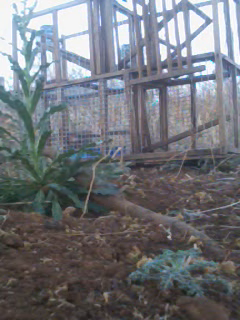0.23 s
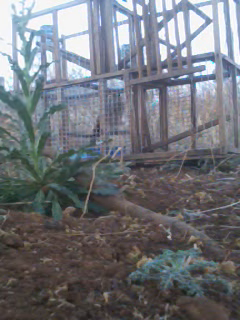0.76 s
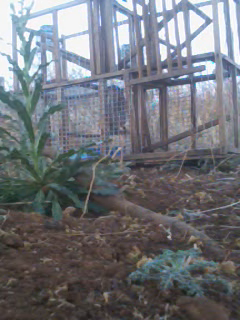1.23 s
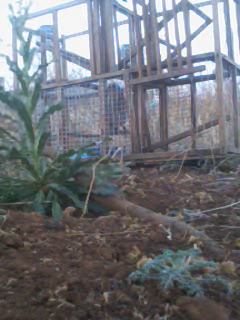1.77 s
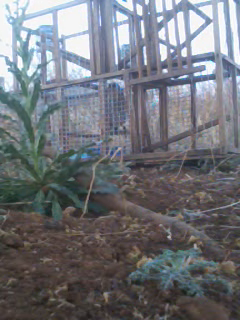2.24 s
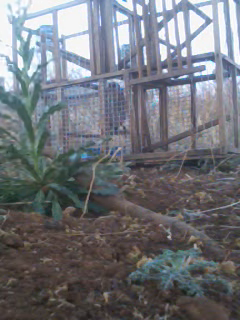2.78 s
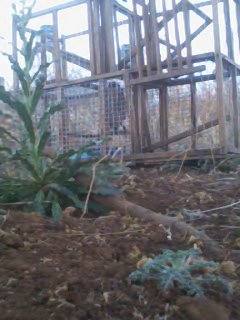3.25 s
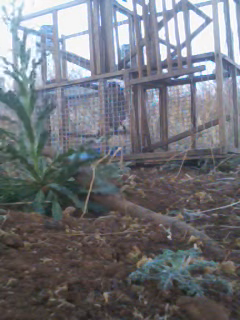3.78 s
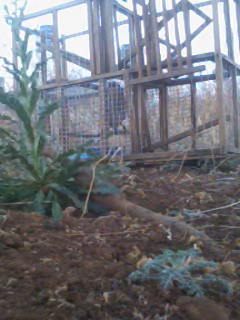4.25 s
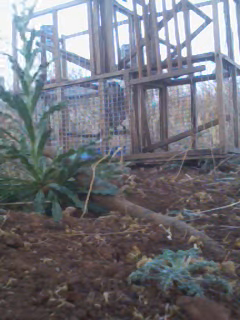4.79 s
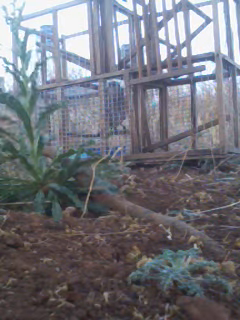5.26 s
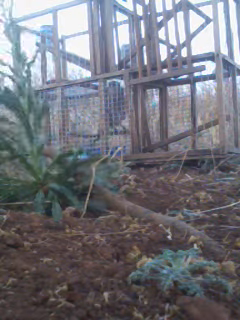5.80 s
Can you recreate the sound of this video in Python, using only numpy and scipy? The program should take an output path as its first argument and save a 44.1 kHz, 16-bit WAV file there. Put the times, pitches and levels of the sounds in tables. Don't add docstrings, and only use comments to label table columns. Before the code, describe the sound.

A songbird a few metres away in an open yard makes two short, rapidly throbbing buzzes, then three shrill, rough two-voiced squeals that shake at the start, then a long low falling whistle and a shorter dipping one. Faint wing flutters, small knocks on wire and wood, and a distant bird's tiny chirps surround it. Wind gusts thump softly on a small, dull-topped microphone over light hiss.

```python
import sys
import numpy as np
from scipy import signal
from scipy.fft import rfft, irfft, next_fast_len
from scipy.io import wavfile
from scipy.ndimage import uniform_filter1d

SR = 44100
rng = np.random.default_rng(int(sys.argv[2]) if len(sys.argv) > 2 else 0)


def unload_wav(signal):
    wavfile.write(
        sys.argv[1],
        SR,
        np.round(np.clip(np.atleast_2d(signal).T, -1, 1) * 32767).astype(np.int16),
    )


def undo_db(level):
    steps = np.asarray(level, float) / 20
    return 10 ** steps


N = 266364


def evened(x):
    return x / np.sqrt(np.mean(x ** 2) + 1e-20)


def white(count):
    return rng.standard_normal(size=N if count > SR else SR + 1)[:count]


def drift(count, hz):
    low_pass = signal.butter(2, min(hz, 9000), fs=SR)
    return evened(signal.lfilter(*low_pass, white(count)))


def shape(x, points):
    f, db = np.transpose(points)
    size = next_fast_len(len(x))
    hz = np.fft.rfftfreq(size, 1 / SR)
    gain = undo_db(np.interp(np.log(hz + 1), np.log(f + 1), db))
    return irfft(rfft(x, size) * gain, size)[:len(x)]


def curves(rows, t=None):
    s, *columns = np.transpose(rows)
    t = np.arange(s[0], s[-1], 1 / SR) if t is None else t
    return t, [np.interp(t, s, c) for c in columns]


def add(mix, s, sound):
    part = mix[round(s * SR):][:len(sound)]
    part += sound[:len(part)]


# (time [s], effort [dB])
BUZZ_EFFORTS = [
    [(0.895, -89), (0.913, -63), (0.955, -61.5), (0.987, -53), (1.195, -47), (1.232, -52.5), (1.262, -109)],
    [(1.67, -79), (1.688, -59), (1.716, -49.5), (1.774, -46.5), (2.008, -47), (2.028, -51.5), (2.047, -100)],
]
# (early pitch [Hz], late pitch [Hz], early level [dB], late level [dB])
THROAT_BANDS = [
    [(2104, 2040, -5.5, -7.5), (2843, 2710, 0, -3), (3500, 3370, -15.5, -13), (4200, 3960, -8, -9),
     (4780, 4630, -21, -6), (5410, 5550, -12.5, -14), (6260, 6450, -9, -26), (7000, 7000, -14.5, -21)],
    [(2140, 2110, -2, -9.5), (2894, 2890, 1.5, -2), (3670, 3640, -9.5, -12.5), (4215, 4260, -5.5, -8),
     (5140, 4900, -7, -21), (5800, 5630, -16.5, -3), (6430, 6420, -9, -15.5), (7160, 7040, -14, -16.5)],
]
# (time [s], throbs so far [count])
THROB_COUNTS = [
    [(.888, -1.5), (.9019, .47), (.9582, 8.47), (1.0019, 14.47), (1.0481, 20.47), (1.1284, 30.47),
     (1.187, 37.47), (1.268, 46.47)],
    [(1.668, -1.5), (1.6819, .47), (1.7455, 9.47), (1.7906, 15.47), (1.871, 25.47), (1.9547, 35.47),
     (2.0095, 41.47), (2.058, 46.47)],
]
# (loss [dB], over [s])
BAND_ENTRIES = [(19.5, 0.067), (6, 0.07)]
ENTRY_SHARES = [0, 1.4, 1.2, 0.43, 0.93, 1.5, 1.5, 1.1]
SHORTER_PER_DB = 0.5


def buzz(efforts, throat, throbs, entry):
    t, (effort_db,) = curves(efforts)
    weak_db = effort_db - effort_db.max()
    turns = 2 + curves(throbs, t)[1][0] + .03 * drift(len(t), 40)
    turns = np.maximum.accumulate(turns)
    throb, phase = turns.astype(int), turns % 1
    sharpness = 1.5 + SHORTER_PER_DB * np.minimum(-weak_db, 20)
    opening = 0.33 * np.sin(np.pi * phase) ** 1.1 + np.sin(np.pi * phase ** 0.86) ** sharpness
    late = np.clip((t - t[0] - .12) / 0.36, 0, 1)
    slide = 0.47 * np.exp((t[0] - t) / 0.014) + 0.25 * np.exp((t - t[-1]) / 0.018)
    chirp_hz = 80 * np.cos(np.pi * phase)
    entry_db = entry[0] * np.exp(-((t - t[0]) / entry[1]) ** 3.0)
    tone = 0
    for k, (early_hz, late_hz, early_db, late_db) in enumerate(throat):
        chance = rng.standard_normal(size=(80, 3))[throb].T
        detune = 1 - slide / (1 + 0.24 * k) + 0.0025 * np.sqrt(k) * chance[2]
        hz = (early_hz + late * (late_hz - early_hz)) * detune + chirp_hz
        steps = np.cumsum(hz) / SR
        since = steps - steps[np.searchsorted(throb, throb)]
        db = early_db + late * (late_db - early_db) + 0.38 * np.sqrt(k) * weak_db
        db = db + 0.33 * (1 + np.sqrt(k)) * chance[1] - ENTRY_SHARES[k] * entry_db
        start = .8 * k ** 2 + 0.22 * (1 + k) * chance[0]
        tone = tone + undo_db(db) * np.sin(2 * np.pi * since + start)
    air_band = [(700, -1.5), (1700, -13.5), (2500, 4.0), (3500, 2.5),
                (5000, -1.5), (7000, -8.5), (8000, -5.5), (8100, -68)]
    air = undo_db(-7 + 0.61 * weak_db) * evened(shape(white(len(t)), air_band))
    sound = shape(opening * (tone + air), [(600, -17.5), (1500, -6.0), (8000, 1.0)])
    treble = shape(sound, [(4600, -36), (5200, -8)])
    sound = sound - (1 - undo_db(-1.5 * entry_db)) * treble
    return t[0], undo_db(effort_db) * sound / np.sqrt(uniform_filter1d(sound ** 2, size=1500))


# (time [s], pitch [Hz], level [dB])
LOWER_VOICES = [
    [(2.276, 2494, -65.5), (2.3, 4120, -55), (2.34, 4410, -60.5), (2.39, 4410, -55.5), (2.49, 4135, -52.5),
     (2.63, 4033, -50.5), (2.85, 3808, -48.5), (2.864, 4290, -62), (2.878, 5130, -86)],
    [(3.037, 2903, -64), (3.05, 3714, -48.5), (3.07, 4150, -52.5), (3.11, 4200, -53), (3.22, 4035, -47),
     (3.27, 3880, -49.5), (3.4, 3815, -49), (3.512, 3788, -52), (3.542, 4840, -73)],
    [(3.76, 2310, -53.5), (3.775, 3457, -50), (3.792, 4000, -49.5), (3.87, 4070, -50.5), (3.95, 4000, -47),
     (4.01, 3788, -48.5), (4.11, 3685, -46), (4.238, 3680, -58.5), (4.254, 4070, -70)],
]
# (time [s], pitch [Hz])
UPPER_VOICES = [
    [(2.278, 3214), (2.294, 5263), (2.312, 6160), (2.37, 6136), (2.44, 5592), (2.53, 5294), (2.66, 5212),
     (2.785, 5127), (2.83, 5005)],
    [(3.04, 4600), (3.062, 5470), (3.09, 6220), (3.16, 5735), (3.22, 5464), (3.285, 5268), (3.41, 5140),
     (3.485, 5054), (3.54, 4970)],
    [(3.757, 3050), (3.775, 4500), (3.79, 5530), (3.815, 6080), (3.878, 5793), (3.92, 5560), (3.985, 5265),
     (4.105, 5130), (4.26, 4730)],
]
# (level [dB], tires from [s], loss [dB], over [s])
UPPER_SWELLS = [(-49, 2.802, 18.5, 0.054), (-44, 3.394, 18, 0.14), (-45, 4.115, 10, .01)]
# (one trough at [s], settles after [s], depth share [1])
OPENING_SHAKES = [(2.353, 0.09, 1.7), (3.092, 0.078, 0.99), (3.8396, .108, 1.2)]
# (rate [1/s], slowing [1/s per s], share felt by the lower voice [1])
PACES = [(86.8, 18, .7), (86, 24, .15), (91.4, 230, 0.059)]
BEAK_HZ, BEAK_WIDTH_HZ, OCTAVE_DB, OCTAVE_EFFORT = 7700, 150, -10, 2.65
UNDER = .505


def squeal(lower, upper, swell, shaking, pace):
    t, (low_hz, low_db) = curves(lower)
    count = len(t)
    low_hz = low_hz + stepped(t)
    up_hz = curves(upper, t)[1][0]
    up_db = upper_level(t, upper[0][0], swell)
    beak_loss_db = 10 * np.log10(1 + ((2 * low_hz - BEAK_HZ) / BEAK_WIDTH_HZ) ** 2)
    octave_db = OCTAVE_DB - 49.5 + OCTAVE_EFFORT * (low_db + 51.0) - beak_loss_db
    depth_hz, under_db, rough = unrest(t, *shaking[1:])

    rate_hz = np.maximum(pace[0] - pace[1] * (t - shaking[0]), 60)
    turns = np.cumsum(rate_hz + 2.1 * drift(count, 30)) / SR
    turns = turns - np.interp(shaking[0], t, turns)
    dips_hz = depth_hz * (.27 - np.cos(np.pi * turns) ** 8)
    saw = signal.sawtooth(2 * np.pi * turns, .8)
    shake_hz = depth_hz * (.67 - (1 - saw) ** 2 / 2)

    low_hz_shaken = low_hz + pace[2] * shake_hz + 1.06 * dips_hz
    low = 2 * np.pi * np.cumsum(low_hz_shaken + (5 + 170 * rough ** 2) * drift(count, 150)) / SR
    up = 2 * np.pi * np.cumsum(up_hz + shake_hz + (8 + 50 * rough ** 2) * drift(count, 130)) / SR
    under_hz = UNDER * (low_hz + .8 * shake_hz) + 180 * rough ** 2 * drift(count, 110)
    under = 2 * np.pi * np.cumsum(under_hz) / SR

    low_wobble_db = (0.5 + 2.3 * rough) * drift(count, 100)
    sound = undo_db(low_db + 0.0031 * shake_hz + low_wobble_db) * np.sin(low)
    sound += undo_db(up_db + 0.98 * drift(count, 80)) * np.sin(up)
    sound += undo_db(octave_db + 6.5 - 0.049 * dips_hz) * np.sin(2 * low + rough * drift(count, 300))
    drive_db = 0.73 * low_db + 0.31 * np.maximum(up_db, low_db - 2.5)
    drive_db = uniform_filter1d(drive_db, size=600)
    sound += mixed_tones(t, (low, up, under), drive_db, under_db, rough, shake_hz)
    sound += torn_air(drive_db, rough)
    return t[0], np.sqrt(2) * sound * signal.windows.tukey(count, .012)


# (time [s], half width [s], depth [dB])
UPPER_BREAKS = [(2.36, 0.26, 0.5), (2.505, 0.017, 9), (2.615, 0.013, 12.5), (2.655, 0.029, 5),
                (2.68, 0.0028, 14), (2.724, 0.0085, 18), (2.801, 0.0049, 16), (2.82, 0.0039, 4),
                (3.208, 0.0032, 19), (3.249, 0.0055, 29), (3.29, 0.049, 1.5), (3.354, 0.033, 7.5),
                (3.442, 0.0097, 8), (3.944, 0.0028, 5), (3.97, 0.0038, 8), (4.045, 0.024, 14),
                (4.068, 0.0054, 0.5)]
ATTACK_S, ATTACK_DB, RELEASE_S, RELEASE_DB = 0.028, 22.5, 0.016, 28


def upper_level(t, start_s, swell):
    hold_db, tires_s, loss_db, over_s = swell
    db = hold_db - loss_db * np.clip((t - tires_s) / over_s, 0, 1)
    db = db - RELEASE_DB * np.maximum(1 - (t[-1] - t) / RELEASE_S, 0)
    db = db - ATTACK_DB * np.clip(1 - (t - start_s) / ATTACK_S, 0, 1)
    return db - sum(depth * np.exp(-((t - s) / width) ** 2) for s, width, depth in UPPER_BREAKS)


MIXED_TONES = [(2, -1, 0), (-2, 2, 0), (3, -1, 0), (-1, 2, 0), (0, 0, 1), (1, 0, 1), (0, 1, -1), (0, 1, 1),
               (2, -1, 1), (-1, 1, 0)]
MIXED_LEVELS_DB = [-20, -20, -19.5, -20, -3, 3.5, 0, 0.5, -12, -34.5]
# (from [s], to [s], gain led by the lower [dB], gain led by the upper [dB])
COUPLINGS = [(2.287, 2.395, 7, -2), (2.395, 2.44, 9, 1), (2.77, 2.85, 0, -3), (3.13, 3.287, 2.5, -3.5),
             (3.33, 3.55, -5.5, 1.5), (3.79, 3.88, 0.5, 2), (3.878, 4.05, 2, 1), (4.07, 4.124, -10, -2),
             (4.125, 4.182, -8, 8.5), (4.18, 4.302, -11, 5)]
STEAL = 0.37


def mixed_tones(t, voices, drive_db, under_db, rough, shake_hz):
    low, up, under = voices
    grips_db = sum(np.outer(db, (t >= on) * (t < off)) * 1. for on, off, *db in COUPLINGS)
    low_grip_db, up_grip_db = uniform_filter1d(grips_db, size=900, axis=1)
    sound = 0
    for (m, n, u), db in zip(MIXED_TONES, MIXED_LEVELS_DB):
        level_db = drive_db + db + 0.01 * shake_hz + 1.8 * drift(len(t), 44)
        if u:
            level_db = level_db + under_db
        elif m + n == 0:
            level_db = level_db + STEAL * (CALM_UNDER_DB - under_db)
        if m > 1 > u or m == n:
            level_db = level_db + low_grip_db
        if m + u < 0:
            level_db = level_db + up_grip_db
        jitter = 2.4 * rough ** 1.5 * drift(len(t), 330)
        sound = sound + undo_db(level_db) * np.sin(m * low + n * up + u * under + jitter)
    return sound


def torn_air(drive_db, rough):
    count = len(rough)
    air = shape(white(count), [(1700, -25.0), (2500, 3.5), (3300, 15.5), (4300, 4.5),
                               (4750, -5), (5300, 4.5), (5900, 10), (8000, -11.5)])
    flicker = undo_db(3 * drift(count, 250))
    return undo_db(drive_db - 1.5) * rough ** 1.07 * evened(air) * flicker


# (from [s], to [s], roughness [0-1], undertone [dB])
UNREST_SPELLS = [(2.26, 2.395, 0.47, -17), (2.395, 2.438, 0.22, -28), (2.439, 2.5, 0.4, -12.5),
                 (2.494, 2.668, 0.2, -12), (2.673, 2.768, 0.26, -17), (2.844, 2.858, 0.3, -12.5),
                 (3.02, 3.133, 0.28, -20), (3.305, 3.325, 0.48, -16.5), (3.318, 3.362, 0.26, -22),
                 (3.362, 3.386, 0.4, -22.5), (3.393, 3.42, .2, -19.5), (3.42, 3.528, 0.52, -15),
                 (3.74, 3.89, 0.23, -25.5), (4.088, 4.124, .17, -24), (4.123, 4.179, 0.48, -15),
                 (4.179, 4.24, 0.38, -22)]
CALM_ROUGH, CALM_UNDER_DB, BLEND_S = 0.11, -38.5, 0.014
SHAKE_HZ, SHAKE_GAIN_HZ, CALM_HZ, SETTLE_S = 168, 176, 24.32, 0.016
SHAKE_ONSET_S = .035
CRACK_S, CRACK_ROUGH, CRACK_UNDER_DB = 0.021, 0.75, -28


def unrest(t, shake_s, share):
    since, cracked = t - t[0], t > t[-1] - CRACK_S
    onset = np.minimum(since / SHAKE_ONSET_S, 1) ** 2
    deepening_hz = SHAKE_HZ + SHAKE_GAIN_HZ * np.minimum(since / shake_s, 1)
    settling = np.exp(np.minimum(shake_s - since, 0) / SETTLE_S)
    depth_hz = CALM_HZ + share * onset * deepening_hz * settling
    rough = np.full(len(t), CALM_ROUGH)
    under_db = np.full(len(t), float(CALM_UNDER_DB))
    for from_s, to_s, spell_rough, db in UNREST_SPELLS:
        inside = (t >= from_s) & (t < to_s)
        rough[inside], under_db[inside] = spell_rough, db
    rough[cracked], under_db[cracked] = CRACK_ROUGH, CRACK_UNDER_DB
    state = [depth_hz, under_db, np.maximum(rough, 0)]
    return uniform_filter1d(state, size=round(BLEND_S * SR), axis=1)


# (from [s], to [s], step [Hz])
PITCH_STEPS = [
    (2.692, 2.735, 65),
    (3.43, 3.495, 60),
    (4.124, 4.3, 55),
    (4.176, 4.3, 120),
    (5.35, 5.6, -42),
    (5.478, 5.6, -22),
]


def stepped(t):
    offset_hz = sum(hz * 1. * (t >= on) * (t < off) for on, off, hz in PITCH_STEPS)
    return uniform_filter1d(offset_hz, size=400)


# (time [s], pitch [Hz], level [dB])
FOLD_PIPS = [(2.27, 2310, -66), (3.032, 2820, -66), (3.752, 2380, -57.5)]


def pip(s, hz, db):
    t = np.arange(0, .006, 1 / SR)
    tone = np.sin(2 * np.pi * hz * t + 0.52 * drift(len(t), 1500))
    return s, undo_db(db + 3.5) * tone * np.hanning(len(t))


# (time [s], pitch [Hz], level [dB], pressure [dB])
WHISTLE_GLIDES = [
    [(4.52, 1246, -61.5, -4), (4.572, 1265, -53.5, -10.5), (4.732, 1231, -55.5, 0),
     (4.972, 1191, -56.5, -1.4), (5.206, 1150, -56.5, 0), (5.3, 1099, -60, 3.5), (5.352, 1037, -63.5, 10),
     (5.47, 1032, -62, 12), (5.53, 970, -66.5, 10.5)],
    [(5.855, 1155, -58, -10), (5.903, 1202, -57.5, -9.5), (5.961, 1125, -55, -0.5),
     (6.022, 1072, -58, 12.5), (6.12, 1195, -64, 24)],
]
SCOOP_HZ, SCOOP_S, QUIVER_HZ, QUIVERS_PER_S, QUIVER_FROM_S = 50, 0.016, 7.8, 31, 0.56
THIRD_DB, THIRD_GAIN, FOURTH_DB, FOURTH_GAIN, STOP_S = -33, 1.51, -32.5, 0.81, 0.013
DIP_HZ, DIP_WIDTH_HZ, DIP_DB, TOP_HZ, TOP_LOSS_DB = 3540, 39, 10.5, 4650, 12


def whistle(rows):
    t, (hz, level_db, pressure_db) = curves(rows)
    count, since = len(t), t - t[0]
    quiver_depth_hz = QUIVER_HZ * np.clip((since - QUIVER_FROM_S) / 0.091, 0, 1)
    quiver_hz = quiver_depth_hz * np.sin(2 * np.pi * QUIVERS_PER_S * since + 0.27 * drift(count, 20.0))
    hz = hz - SCOOP_HZ * np.exp(-since / SCOOP_S) + quiver_hz + stepped(t)
    dip_db = DIP_DB * np.exp(-((3. * hz - DIP_HZ) / DIP_WIDTH_HZ) ** 2)
    third_db = THIRD_DB + THIRD_GAIN * np.maximum(pressure_db, 0) - dip_db
    top_loss_db = TOP_LOSS_DB * np.clip((4 * hz - TOP_HZ) / 100, 0, 1)
    fourth_db = FOURTH_DB + FOURTH_GAIN * pressure_db - top_loss_db
    rasp = 0.019 + 0.25 * np.exp((t - t[-1]) / 0.01)
    turn = 2 * np.pi * np.cumsum(hz + 5 * drift(count, 10.8) + 3 * drift(count, 40)) / SR
    turn = turn + rasp * drift(count, 310)
    sound = 0
    for k, db in enumerate([0, pressure_db, third_db, fourth_db]):
        wobble_db = (.5 + 0.3 * k ** 2) * drift(count, 40)
        sound = sound + undo_db(level_db + db + wobble_db) * np.sin((k + 1) * turn)
    edges = np.minimum(since / 0.0027, 1) * np.minimum((t[-1] - t) / STOP_S, 1) ** 2
    return t[0], np.sqrt(2) * sound * edges


# (time [s], length [s], level [dB], brightness [Hz])
WING_FLAPS = [(0.037, 0.13, -78.5, 3500), (0.143, 0.071, -78, 4760), (0.23, 0.043, -83, 6500),
              (0.386, .02, -97, 5500), (4.471, 0.014, -78, 7000), (4.86, 0.022, -78, 7560),
              (5.302, 0.036, -80.5, 7000), (5.71, 0.099, -84, 1520), (3.593, 0.088, -79.5, 7000),
              (3.682, 0.062, -82, 7000), (5.505, 0.038, -72, 2870), (4.879, 0.1, -82, 2200),
              (5.163, 0.04, -81, 6520), (5.189, 0.12, -80, 4500), (5.425, .02, -73, 4000),
              (5.468, .016, -80, 6500)]


def wing_flaps():
    out = np.zeros(N)
    for s, length_s, db, hz in WING_FLAPS:
        count = round(length_s * SR)
        band = [(hz / 4, -18), (0.22 * hz, 0), (hz, 0), (1.25 * hz, -18)]
        puff = evened(shape(white(count), band)) * undo_db(2 * drift(count, 200))
        add(out, s, undo_db(db) * puff * np.hanning(count))
    return out


# (time [s], peak [dB], ring [Hz], t60 [s])
CAGE_TAPS = [(.083, -69, 1090, 0.053), (.095, -73, 1250, 0.027), (0.094, -70, 2840, 0.022),
             (.182, -70, 1250, 0.022), (0.166, -58, 1540, 0.015), (0.264, -71, 1600, 0.048),
             (0.262, -62.5, 3170, 0.031), (0.266, -65, 2750, 0.027), (0.345, -77, 895, .02),
             (0.619, -64, 880, 0.016), (2.243, -74, 670, 0.045), (2.382, -53, 840, 0.034),
             (2.383, -58, 1220, 0.025), (2.384, -58, 525, 0.037), (2.706, -56.5, 490, 0.033),
             (2.33, -63, 397, 0.04), (2.443, -63, 600, .025), (2.804, -53, 550, 0.026),
             (3.381, -53, 420, 0.035), (3.396, -54.5, 814, 0.073), (3.425, -50.5, 444, 0.037),
             (4.968, -63, 717, 0.044), (5.52, -60, 2190, .03)]


def cage_taps():
    out = np.zeros(N)
    t = np.arange(SR // 10) / SR
    for s, db, hz, t60_s in CAGE_TAPS:
        ring = np.sin(2 * np.pi * hz * t) + 0.3 * np.sin(2 * np.pi * 2.1 * hz * t)
        ring = ring + 0.2 * drift(len(t), 2700)
        contact = 2.17 * np.exp(-t / 0.0015) * drift(len(t), min(1.5 * hz, 1800))
        tap = undo_db(-60 * t / t60_s) * ring + contact
        add(out, s, undo_db(db - 2.0) * np.minimum(t / 0.0012, 1) * tap)
    return out


# (time [s], length [s], from [Hz], to [Hz], level [dB])
FAR_NOTES = [(1.357, .018, 4750, 4450, -81), (1.372, .022, 4150, 3900, -80), (1.393, .026, 3650, 3380, -79),
             (1.43, .009, 3300, 3050, -84), (4.367, .009, 4650, 4400, -82), (1.58, .024, 5010, 5000, -89),
             (.545, .02, 5000, 4950, -89), (5.204, .026, 4000, 3800, -80), (5.224, .014, 5100, 4900, -83),
             (5.138, .03, 5600, 6150, -83), (5.188, .016, 6900, 6850, -84), (4.885, .04, 2050, 2000, -80)]


def far_bird():
    out = np.zeros(N)
    for s, length_s, from_hz, to_hz, db in FAR_NOTES:
        hz = np.linspace(from_hz, to_hz, round(length_s * SR))
        turn = 2 * np.pi * np.cumsum(hz) / SR + .7 * drift(len(hz), 250)
        add(out, s, undo_db(db) * np.sin(turn) * signal.windows.tukey(len(hz), .7))
    return out


# (delay [s], level [dB])
YARD_ECHOES = [(.0072, -10), (0.013, -9.5), (0.017, -20.5)]


def yard(x):
    taps = np.zeros(SR // 4)
    for s, db in YARD_ECHOES:
        taps[round(s * SR)] = undo_db(db)
    t = np.arange(len(taps)) / SR
    tail = rng.standard_normal(len(t)) * undo_db(-60 * t / 0.27) * (t > .015)
    taps += undo_db(-23.0) * tail / np.linalg.norm(tail)
    bright = shape(x, [(1000, -23.5), (4000, -10.0), (5000, 3.0), (8000, -3.5)])
    return x + signal.oaconvolve(bright, taps)[:N]


# (frequency [Hz], gain [dB])
MIC_BAND = [(20, -4.5), (6600, 1), (7500, -12), (8000, -23), (8700, -29), (9200, -44)]
RATE_HZ = 16000


def sampled(x):
    mirror = 2 * x * np.cos(2 * np.pi * RATE_HZ * np.arange(N) / SR)
    return shape(x + undo_db(-1.0) * mirror, MIC_BAND)


# (time [s], half width [s], rumble [dB], roar [dB])
MIC_GUSTS = [(.39, 0.14, -75, -98), (.82, 0.04, -55.5, -94), (.89, 0.039, -62, -88.5),
             (.99, 0.022, -69, -63), (1.047, 0.013, -51.5, -65.5), (1.13, 0.053, -65, -73),
             (1.382, 0.17, -61, -86), (1.84, 0.051, -53, -68), (1.91, 0.18, -61, -73),
             (2.15, 0.12, -66.5, -86), (2.58, 0.21, -69, -88.5), (2.91, 0.058, -51, -89.5),
             (2.98, 0.013, -61, -66), (3.1, .08, -59.5, -80.5), (3.392, 0.055, -82.5, -65.5),
             (3.535, 0.044, -50.5, -66), (3.64, 0.12, -54, -66.5), (3.853, 0.034, -50, -60.5),
             (3.938, 0.05, -52.5, -59.5), (4.05, 0.11, -54.5, -71), (4.25, .2, -67.5, -96.5),
             (5.38, 0.039, -53.5, -68.5), (5.47, 0.07, -53.5, -75.5), (5.89, 0.039, -67.5, -82.5),
             (6.004, 0.017, -48.5, -75)]
# (time [s], level [dB])
LEAF_BREEZE = [(0, -99), (.8, -91.5), (2.1, -82), (3, -77), (4.4, -75.5), (5.6, -73.5), (6.04, -69)]
# (frequency [Hz], density [dB per Hz])
RUMBLE_BAND = [(4.7, -27.5), (8.0, 5), (108, -1), (208, -12), (370, -21.5), (800, -46.5), (1040, -60.5),
               (1760, -120)]
# (frequency [Hz], density [dB per Hz])
HISS_BAND = [(120, -28), (200, -3.5), (757, -10), (1260, -13), (2450, -19), (5760, -20), (6440, -24.5)]
LULL_DB, ROAR_OVER_BREEZE_DB = -71, 4


def wind():
    t, fine_t = np.arange(0, N + 64, 64) / SR, np.arange(N) / SR
    breeze_db = curves(LEAF_BREEZE, t)[1][0]
    s, width, *peaks_db = np.transpose(MIC_GUSTS)[:, :, None]
    bumps = np.exp(-((t - s) / width) ** 2)
    pushes = []
    for lull_db, db in zip([LULL_DB, breeze_db + ROAR_OVER_BREEZE_DB], peaks_db):
        push = undo_db(lull_db) + np.sqrt(((undo_db(db) * bumps) ** 2).sum(0))
        pushes.append(np.interp(fine_t, t, push))
    rumble_push, roar_push = pushes
    lumps = drift(N, 22.6)
    rumble = evened(shape(rng.standard_normal(N), RUMBLE_BAND) * undo_db(1.0 * lumps))
    roar_band = [(120, -16.5), (220, 3.5), (600, -6.0), (1500, -16.5), (3000, -45.5)]
    roar = shape(rng.standard_normal(N), roar_band)
    roar = evened(roar * undo_db(2 * lumps + 2 * drift(N, 60)))
    hiss = shape(rng.standard_normal(N), HISS_BAND + [(7300, -30.0), (7900, -56.5), (9000, -76.0)])
    hiss = evened(hiss * undo_db(0.81 * drift(N, 18)))
    leaf_band = [(200, -5.0), (600, 0.5), (1200, -4.5), (2500, -14.0), (5000, -41.5)]
    leaves = evened(shape(white(N), leaf_band))
    leaves = leaves * undo_db(curves(LEAF_BREEZE, fine_t)[1][0] + 0.5 * drift(N, 23))
    return rumble_push * rumble + undo_db(-7.0) * roar_push * roar + undo_db(-79.0) * hiss + leaves


def scene():
    near = np.zeros(N)
    for parts in zip(BUZZ_EFFORTS, THROAT_BANDS, THROB_COUNTS, BAND_ENTRIES):
        add(near, *buzz(*parts))
    for voices in zip(LOWER_VOICES, UPPER_VOICES, UPPER_SWELLS, OPENING_SHAKES, PACES):
        add(near, *squeal(*voices))
    for row in FOLD_PIPS:
        add(near, *pip(*row))
    for rows in WHISTLE_GLIDES:
        add(near, *whistle(rows))
    near += wing_flaps() + cage_taps() + far_bird()
    return np.array([sampled(yard(near)) + wind()])


def top_cut(x):
    return signal.sosfilt(signal.butter(12, 8990, fs=SR, output="sos"), x)


def record(dry):
    offset = -.0011
    return top_cut(dry + offset)


dry = scene()
out = record(dry)
unload_wav(out)
```